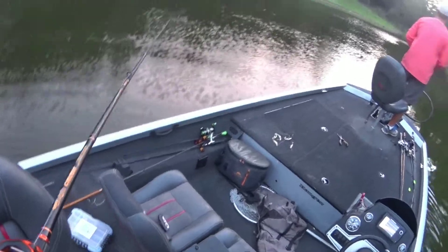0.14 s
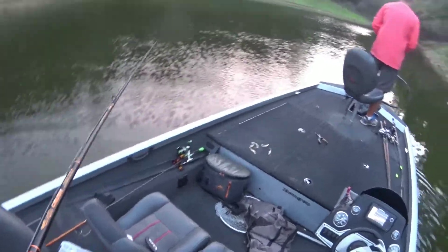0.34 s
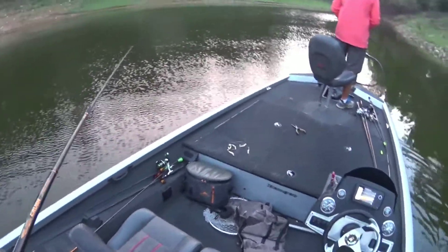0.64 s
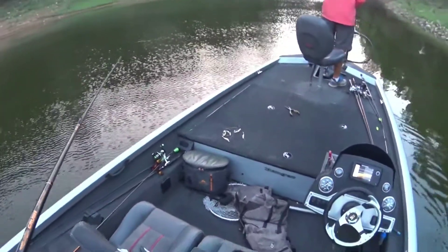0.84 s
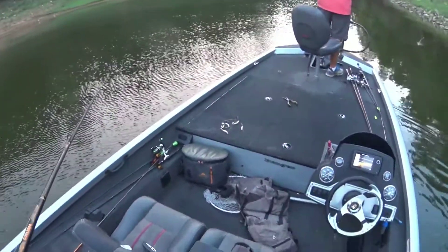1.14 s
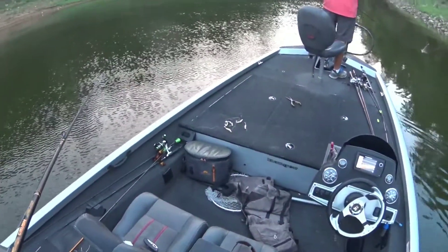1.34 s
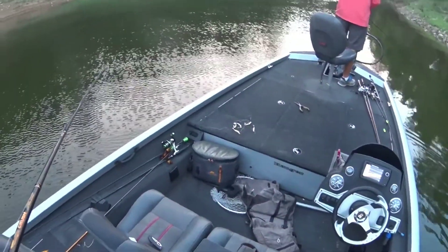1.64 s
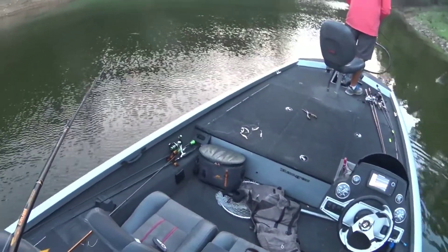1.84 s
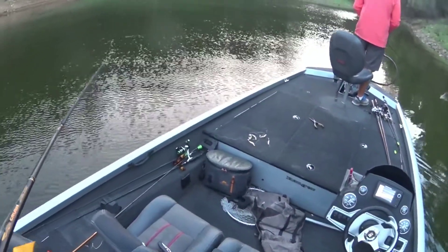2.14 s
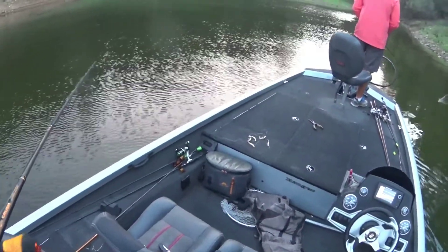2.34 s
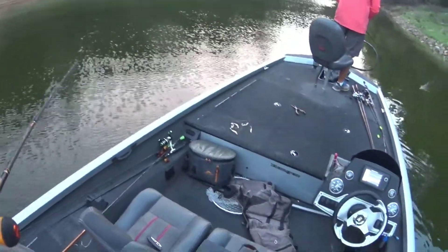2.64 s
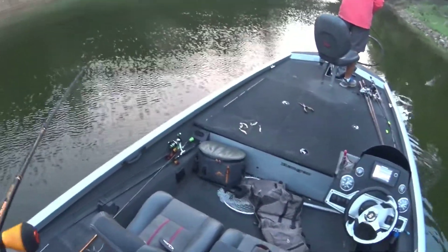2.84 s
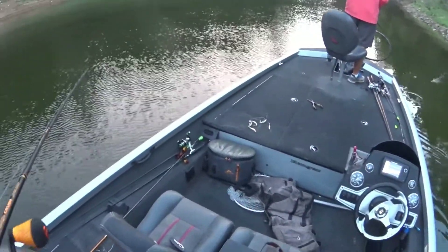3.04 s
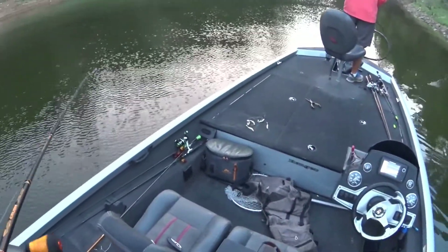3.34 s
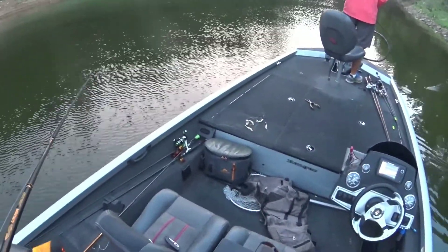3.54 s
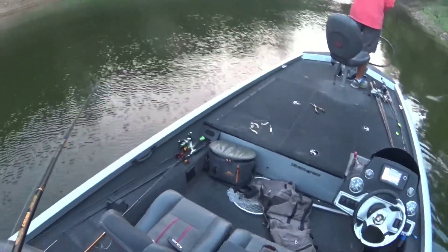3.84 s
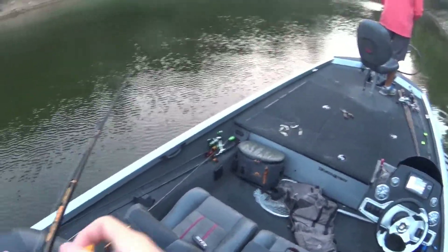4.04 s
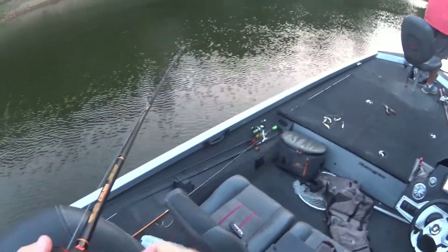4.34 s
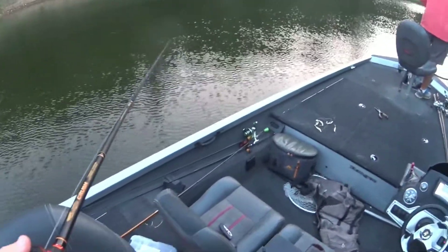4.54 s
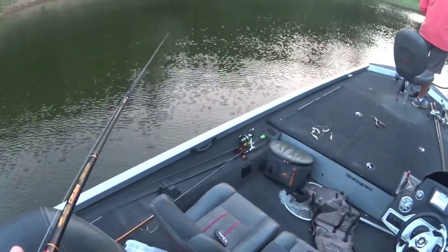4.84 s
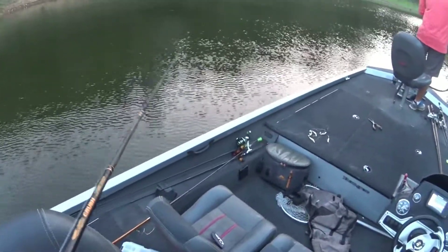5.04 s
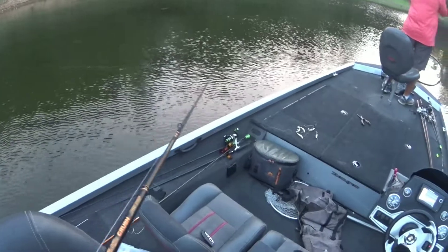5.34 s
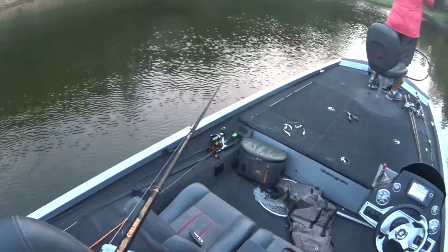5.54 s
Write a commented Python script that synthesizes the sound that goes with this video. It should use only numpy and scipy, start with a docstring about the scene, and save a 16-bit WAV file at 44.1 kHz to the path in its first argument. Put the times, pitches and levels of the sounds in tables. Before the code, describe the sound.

A quiet outdoor lake heard from a microphone worn on an angler's body in a boat. Faint, steady cicada buzz around a high pitch, with thinner, lispy katydid chirps above it, runs throughout over a soft, wide wash of air and water. Cloth scuffs and dull housing taps start at about 0.15 seconds. At 0.31 a reel snaps shut: a small latch click far left, a loud, bright clack, then a lower rebound, slightly left, with a very short echo. Taps follow near 0.47, 1.1 and 1.35, with faint ticks at 0.9 and 1.2. Small fabric rubs continue, clearest near 2.35, thinning after 3. At about 3.78 a soft, hollow, short knock sounds on the deck. Gentle bumps and light, slightly ringing reel ticks follow from 4.0 to 4.9, then mostly insects and faint cloth until the end, with a slight sleeve rustle near 5.7. The extreme treble is cut off.

```python
"""Cloth scuffs and taps on a body-worn camera housing recur; a reel snaps shut early, with light ticks
before and after. Cicadas and katydids sing steadily from a wooded bank; one knock sounds on the hollow
deck of a boat. Contacts are noisy pushes into resonant bodies, and the knock is a sum of fading modes.
Cicadas are pulsed noise, katydids noise chirps on wavering carriers, and the lake air is shaped noise."""
import sys
import numpy as np
from scipy import signal
from scipy.fft import rfft, irfft
from scipy.io import wavfile

SR = 44100
rng = np.random.default_rng(int(sys.argv[2]) if len(sys.argv) > 2 else 0)


def materialize(psi):
    """Save the field psi as 16-bit PCM at rate SR to the path in sys.argv[1].

    A 1-D psi becomes a single channel; in a 2-D psi each row is a channel.
    """
    bounded = np.clip(np.atleast_2d(psi).T, -1, 1)
    quanta = np.round(bounded * 32767).astype(np.int16)
    wavfile.write(sys.argv[1], SR, quanta)


N = 251370  # samples
EARS = np.array([[.5], [-.5]])  # left, right
LEAD = 256  # samples before the push of a contact


# reel and rod resonances: centre_hz, width_hz, level_db, ear_phase_rad
REEL_BODY = [(1300, 310, -9.5, .5), (1900, 300, -10, 0.61), (2320, 380, -8.5, 0.82), (2830, 280, -2.5, 1),
             (3200, 810, -8, 0.28), (3990, 480, -5.5, 0.25), (4650, 520, -2.5, 0.33), (4930, 610, -3, 0.44),
             (5910, 410, -2, 0.35), (7100, 1200, -11.5, 0.96), (8600, 620, -14, 0.87),
             (10050, 1700, -13, 0.65)]
# reel modes that ring on after a click: pitch_hz, level_db, t60_s
REEL_RINGS = [(2624, -2, .028), (2983, -9, .03), (3830, 0.5, .15), (4500, -7, .025), (5070, -5, 0.034)]
# reel snapping shut (latch, stop, rebound): start_s, peak_db, push_hz, rattle_decay_s, left_minus_right_db
REEL_SNAP = [(0.3141, -23.5, 10000, 0.00091, 18), (0.3173, -6.5, 5000, 0.0032, 4),
             (0.3301, -13.5, 2370, 0.0052, 3.5)]
# light reel ticks: start_s, peak_db, push_hz, ring_db
REEL_TICKS = [(.284, -36, 3600, -10), (0.35, -33, 2400, -1), (.898, -43, 2900, -5),
              (1.197, -36.5, 5300, -10), (1.249, -39, 5000, -10), (3.191, -41.5, 1900, -5),
              (4.3073, -38.5, 4000, 7), (4.5395, -37.5, 4100, 4), (4.713, -43, 4000, -10),
              (4.864, -35.5, 2700, 7)]
SNAP_RING_DB, RING_OCTAVES = -7, 0.63  # a click rings the modes near its push_hz
TICK_RATTLE_S, TICK_PAN_DB = 0.0034, -1  # pan: left minus right


def reel_click(out, start_s, peak_db, push_hz, decay_s, pan_db, ring_db, boat_echo=0.017, echo_s=0.015):
    """Hard parts meet and rattle; the cockpit returns a faint short echo, different in each ear."""
    echo = np.array([contact(echo_s, boat_echo) - contact(echo_s, 0) for _ in EARS])
    push = band(contact(decay_s, chatter=0.098) + echo, push_hz, octaves=1.38)
    body = resonate(push, REEL_BODY)
    rings = ring_on(band(push, push_hz, RING_OCTAVES), REEL_RINGS)
    add(out, start_s - LEAD / SR, body + amp(ring_db) * rings, peak_db, pan_db)


def reel():
    """Small hard parts snap home and tick lightly, once just before the snap and now and then after."""
    out = np.zeros((2, N))
    for row in REEL_SNAP:
        reel_click(out, *row, SNAP_RING_DB)
    for start_s, peak_db, push_hz, ring_db in REEL_TICKS:
        reel_click(out, start_s, peak_db, push_hz, TICK_RATTLE_S, TICK_PAN_DB, ring_db)
    return out


# hollow deck modes: pitch_hz, level_db, t60_s, ear_phase_rad
DECK_MODES = [(327, -23, 0.099, 2.3), (627, -13.5, 0.083, 2), (750, 6, 0.027, 1.36), (1010, -8, 0.018, 1.1),
              (1530, -16, 0.034, .6), (2020, -9, 0.031, .5), (2285, -2.5, 0.017, .4)]
KNOCK_S, KNOCK_PEAK_DB, KNOCK_PAN_DB = 3.7762, -19, 2  # pan: left minus right


def knock(contact_s=0.0005, sag=0.156, thin_hz=220, dull_hz=2700):
    """One soft blow rings the hollow deck, with neither deep bass nor treble; its pitches sag."""
    out = np.zeros((2, N))
    body = sum(amp(db) * ring(hz, t60_s, phase, sag) for hz, db, t60_s, phase in DECK_MODES)
    onset = 1 - np.exp(-np.arange(body.shape[1]) / SR / contact_s)
    deck_band = signal.butter(5, [thin_hz, dull_hz], "band", fs=SR, output="sos")
    radiated = signal.sosfilt(deck_band, body * onset)
    add(out, KNOCK_S, radiated, KNOCK_PEAK_DB, KNOCK_PAN_DB)
    return out


# camera housing resonances: centre_hz, width_hz, level_db, ear_phase_rad
HOUSING_BODY = [(261, 276, -12.5, 0.3), (740, 176, -6, 1.33), (899, 320, -1.5, 1.1), (1278, 196, 3, 0.54),
                (1738, 296, -1.5, 0.3), (2155, 540, -6, 0.29), (2410, 330, -2, 0.4), (3550, 260, -15, 1.25),
                (4674, 380, -10, 0.63)]
# housing modes that ring on after a tap: pitch_hz, level_db, t60_s
HOUSING_RINGS = [(255, 7, .019), (872, 0, .024), (2400, 2.5, 0.016)]
# taps on the housing: start_s, peak_db, push_hz, ring_db
HOUSING_TAPS = [(0.1536, -28, 1000, -11), (.197, -27.5, 910, -11), (0.4687, -28, 1550, -19),
                (1.085, -29.5, 950, 3.5), (1.260, -39, 1300, -20), (1.3436, -29, 1200, 2.5),
                (1.748, -41.5, 1200, -15), (3.8844, -43.5, 1300, -20), (4.047, -35.5, 1000, -1),
                (4.111, -46, 450, -2), (4.264, -41, 1190, -15), (4.591, -40, 1300, -12),
                (4.753, -39, 1200, -13)]
TAP_CHATTER_S = 0.004  # decay


def taps():
    """The housing bumps against the wearer's gear and rings on by a set amount for each bump."""
    out = np.zeros((2, N))
    for start_s, peak_db, push_hz, ring_db in HOUSING_TAPS:
        push = band(contact(TAP_CHATTER_S, chatter=0.16), push_hz, octaves=2.1)
        rings = ring_on(push, HOUSING_RINGS)
        add(out, start_s - LEAD / SR, resonate(push, HOUSING_BODY) + amp(ring_db) * rings, peak_db)
    return out


# quick cloth scuffs: centre_s, level_db, length_s
CLOTH_SCUFFS = [(.065, -53, .035), (.107, -49.5, .04), (.194, -39.5, 0.058), (.452, -43, 0.084),
                (1.243, -52, 0.05), (1.375, -47.5, .085), (1.692, -48.5, .05), (1.832, -46, 0.084),
                (1.97, -55, 0.064), (2.148, -50, .021), (2.219, -49.5, .04), (2.361, -41, 0.049),
                (2.521, -52.5, 0.031), (2.761, -51, 0.045), (2.929, -56.5, 0.038), (2.997, -49.5, 0.031),
                (4.047, -52, 0.048), (4.194, -50, .03), (4.46, -53, .03), (5.662, -53, 0.05)]
# slow slides of cloth as the wearer shifts: centre_s, level_db, length_s
WEARER_SHIFTS = [(.23, -48.5, 0.28), (.5, -50.5, 0.13), (.8, -55.5, 0.23), (1.51, -54, 0.28),
                 (2.35, -59, 1.0), (4.18, -52.5, 0.29), (5.33, -59.5, .2)]
# sleeve swishes in the open: centre_s, level_db (before swish_gain_db), length_s
SLEEVE_SWISHES = [(2.495, -55.5, 0.089), (2.64, -63, .13), (4.125, -59, .04), (5.68, -62, 0.055)]
REST_DB = -65.5  # cloth sliding while the wearer keeps still
CATCH_PER_S, CATCH_DB = 28, 2.06  # sliding cloth catches and lets go: pace, depth


def cloth(grain_db=3.0, flutter_db=0.37, snags_per_s=300, snag_db=-5, apart=0.16, swish_gain_db=1):
    """Fibres slide and snag on the housing and ring it; a loose sleeve swishes higher up."""
    slide = np.sqrt(amp(REST_DB) ** 2 + swells(WEARER_SHIFTS)) * amp(CATCH_DB * walk(CATCH_PER_S))
    force = np.sqrt(slide ** 2 + swells(CLOTH_SCUFFS))
    uneven = amp(grain_db * walk(170) + flutter_db * walk(50))
    snags = (rng.random(N) < snags_per_s / SR) * rng.standard_normal(N)
    slips = level(rng.standard_normal(N) * uneven, 0) + level(snags, snag_db)
    rub = resonate(slips + apart * rng.standard_normal((2, N)), HOUSING_BODY)
    sleeve_noise = rng.standard_normal(N) + .5 * rng.standard_normal((2, N))
    sleeve = band(uneven * sleeve_noise, 2800, octaves=1.0)
    swishes = level(sleeve, swish_gain_db) * np.sqrt(swells(SLEEVE_SWISHES))
    return level(rub, 0) * force + swishes


def buzz(rate_hz, duty, wander):
    """One cicada: each buckle of its tymbals is a brief burst, blurred by the leaves."""
    phase = np.cumsum(rate_hz * (1 + wander * walk(3))) / SR % 1
    return level(np.exp(-phase / duty) * rng.standard_normal(N), 0)


# cicada body resonances: centre_hz, width_hz, level_db, ear_phase_rad
CICADA_BODY = [(6300, 670, -17, 0.81), (6163, 850, -0.5, 0.33), (6530, 290, -4.5, 1.65)]


def cicadas(near_re_crowd_db=-9, direct_db=-61.0, scatter_db=-69, count=6):
    """One nearer singer over a crowd with unrelated pulse rates, and their scatter from the trees."""
    near = buzz(90, duty=.3, wander=.005)
    crowd = 0
    for _ in range(count):
        singer = buzz(rng.uniform(95, 240), duty=.4, wander=.03)
        crowd = crowd + singer * amp(1.2 * walk(1.5))
    direct = resonate(level(near, near_re_crowd_db) + level(crowd, 0), CICADA_BODY)
    scatter = resonate(rng.standard_normal((2, N)), CICADA_BODY)
    return level(direct, direct_db) + level(scatter, scatter_db)


def katydids(level_db=-72.0, pitch_hz=8350, spread_hz=320, width_hz=340, chirp_hz=5, count=5):
    """Thin lisping chirps that overlap; each singer keeps its own loose beat and wavering pitch."""
    out = 0
    lowpass = signal.butter(2, width_hz / 2, fs=SR, output="sos")
    for _ in range(count):
        beat = np.cumsum(chirp_hz * (1 + 0.355 * walk(5))) / SR + rng.random()
        carrier = np.cumsum(pitch_hz + spread_hz * walk(9)) / SR
        rasp = signal.sosfilt(lowpass, rng.standard_normal(N))
        chirps = np.sin(np.pi * beat) ** 4 * amp(2 * walk(4))
        out = out + rasp * chirps * np.cos(2 * np.pi * carrier + EARS * rng.uniform(-2.7, 2.0))
    return level(out, level_db)


# open air over the water: freq_hz, common_db_per_hz (both ears alike), opposed_db_per_hz
AIR_SPECTRUM = [(25.1, -98.5, -110), (70.5, -93.5, -103), (150, -94, -98.5), (300, -95, -93),
                (690, -96.5, -91), (1410, -100, -94.5), (2580, -100, -98.5), (3540, -103, -102),
                (4280, -103, -104), (5000, -101, -105), (7450, -103, -106), (9640, -106, -109),
                (10200, -108, -111)]


def air():
    """Soft wash of water and distant trees: shaped noise, part common to the ears, part opposed."""
    hz, mid_db, side_db = np.transpose(AIR_SPECTRUM)
    log_f = np.log(np.fft.rfftfreq(N, 1 / SR) + 1)

    def shaped(db):
        """White noise given the spectrum of the table."""
        return irfft(rfft(rng.standard_normal(N)) * amp(np.interp(log_f, np.log(hz), db)), N)

    mid, side = shaped(mid_db), shaped(side_db)
    sway_db = .4 * walk(6)
    return (mid + 2 * EARS * side) * np.sqrt(SR / 2) * amp(sway_db)  # sqrt: per-Hz density


def contact(decay_s, chatter, size=8192):
    """A sharp push after a short lead-in, followed by dying chatter."""
    t = (np.arange(size) - LEAD) / SR
    return (t == 0) + chatter * rng.standard_normal(size) * (t > 0) * np.exp(-np.abs(t) / decay_s)


def resonate(x, modes):
    """Pass sound through a resonant body; each resonance reaches the two ears with its own phase."""
    n = x.shape[-1]
    f = np.fft.rfftfreq(n, 1 / SR)
    power = sum((amp(db) / (1 + (2 * (f - hz) / width) ** 2)) ** 2 for hz, width, db, _ in modes)
    cepstrum = irfft(np.log(np.sqrt(power)), n)
    causal = np.exp(rfft(2 * cepstrum[:n // 2], n) - cepstrum[0])  # rings only after it is pushed
    phase = np.interp(f, [m[0] for m in modes], [m[3] for m in modes])
    return irfft(rfft(x) * causal * np.exp(-1j * EARS * phase), n)


def ring(hz, t60_s, phase, sag=0, size=8192):
    """One fading mode in both ears; its pitch may sag by a fraction as it dies away."""
    t = np.arange(size) / SR
    turns = np.cumsum(hz * (1 - sag * (1 - np.exp(-t / .015)))) / SR
    return np.exp(-np.log(1000) * t / t60_s) * np.sin(2 * np.pi * turns - EARS * phase)


def ring_on(push, modes):
    """Modes that a push sets ringing, each fading at its own rate."""
    tone = 0
    for hz, db, t60_s in modes:
        decay_per_sample = np.log(1000) / (t60_s * SR)
        tone = tone + amp(db) * 2 * decay_per_sample * ring(hz, t60_s, phase=0.81)
    return signal.fftconvolve(np.atleast_2d(push), tone, axes=1)[:, :push.shape[-1]]


def band(x, hz, octaves):
    """Broad bell-shaped emphasis around one frequency."""
    f = np.fft.rfftfreq(x.shape[-1], 1 / SR) + 1
    return irfft(rfft(x) / (1 + (np.log2(f / hz) / octaves) ** 2) ** 2, x.shape[-1])


def swells(rows):
    """Power of bell-shaped strokes (centre_s, level_db, length_s) over time."""
    t = clock()[::20]
    power = sum(amp(db) ** 2 * np.exp(-2 * (2 * (t - s) / length_s) ** 2) for s, db, length_s in rows)
    return np.interp(clock(), t, power)


def walk(rate_hz):
    """Random drift, straight lines between normal draws at this rate."""
    steps = rng.standard_normal(1024)
    return np.interp(clock() * rate_hz, np.arange(len(steps)), steps)


def add(out, start_s, sound, peak_db, pan_db=0):
    """Mix in one blow, scaled by the peak of its ear average, with a level offset between ears."""
    i = int(start_s * SR)
    sound = sound[:, :N - i]
    out[:, i:i + sound.shape[1]] += sound * amp(peak_db + EARS * pan_db) / np.abs(sound.mean(0)).max()


def amp(db):
    """Decibels to gain."""
    return 10 ** (np.asarray(db) / 20)


def level(x, db):
    """Scale to an rms level."""
    return x * amp(db) / np.sqrt(np.mean(x ** 2))


def clock():
    """Time of every sample in seconds."""
    return np.arange(N) / SR


def scene():
    """The angler, the boat and the bank together."""
    return reel() + knock() + taps() + cloth() + cicadas() + katydids() + air()


def record(dry, top_hz=11100):
    """The camera cuts the top steeply."""
    return signal.sosfilt(signal.ellip(10, .2, 70, top_hz, fs=SR, output="sos"), dry)


dry = scene()
out = record(dry)
materialize(out)
```